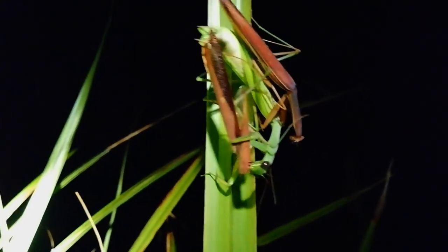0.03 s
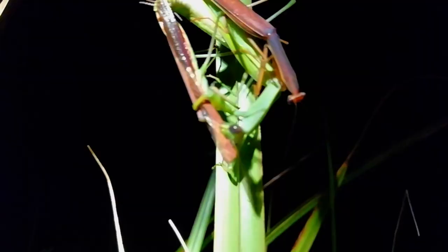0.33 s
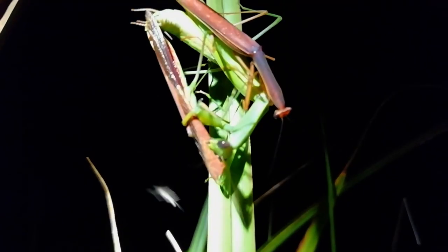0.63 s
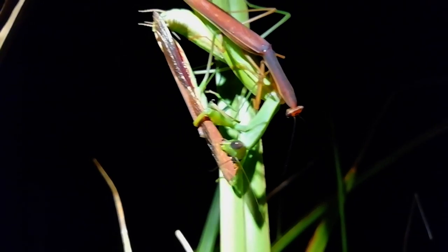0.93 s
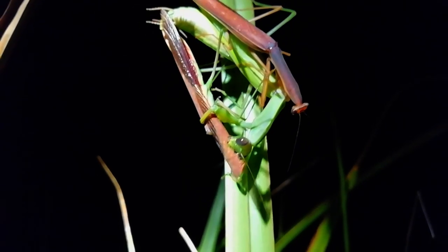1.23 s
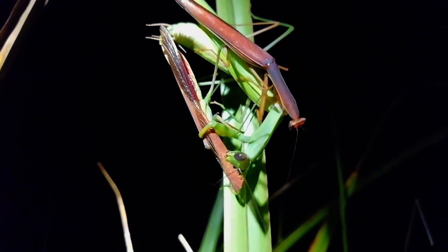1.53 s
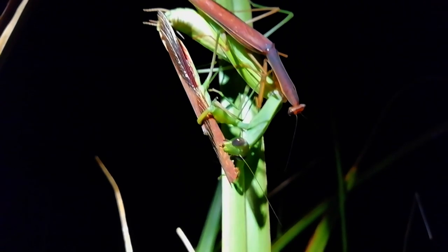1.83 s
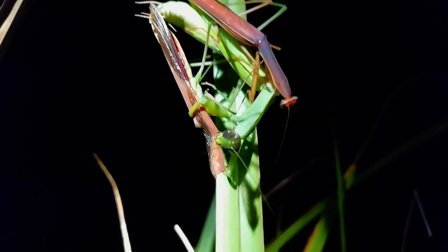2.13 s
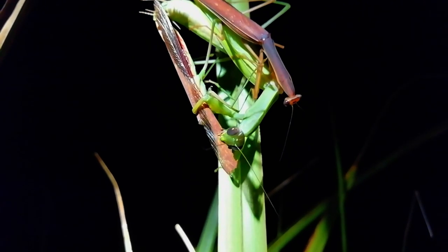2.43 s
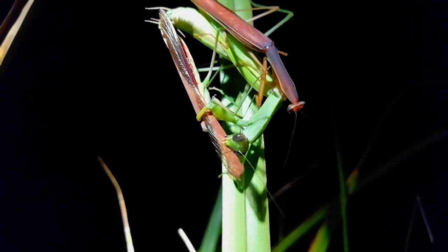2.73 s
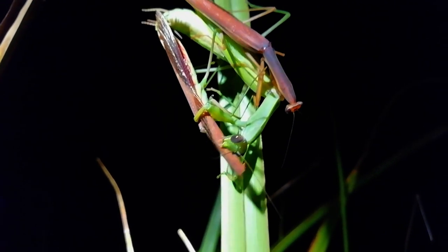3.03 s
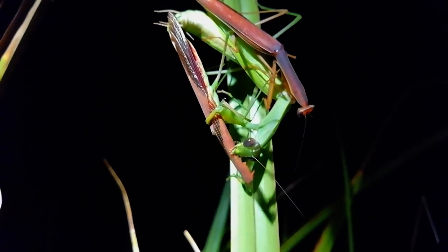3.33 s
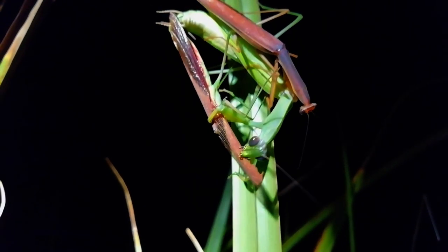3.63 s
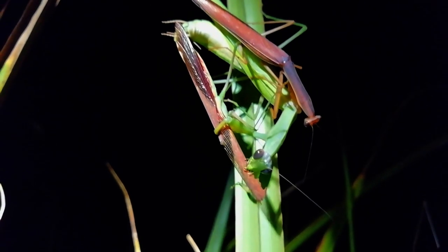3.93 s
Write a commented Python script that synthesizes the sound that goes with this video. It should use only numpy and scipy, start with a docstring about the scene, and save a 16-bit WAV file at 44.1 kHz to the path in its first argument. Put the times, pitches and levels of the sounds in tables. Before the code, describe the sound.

A dense cricket chorus trills and chirps throughout in night grass, opening with one close, shivering note. From about 0.6 seconds, short rising whistles and sharp ticks join, the ticks strongest near 1 second, as the right side turns duller. Soft microphone bumps follow over low rumble. A distant animal rasps faintly around 1.3, 2.5 and 3.7 seconds, and a stalk snaps lightly near 2.9.

```python
"""Night in tall grass, a hand-held camera's microphone amid a dense chorus of wing-stroking crickets.
A close cricket's notes open over near trills, a steady chirper and rising whistles. Within the first
second the right side loses most of its treble and sharp ticks set in; then bumps join the handling rumble.
From 1.3 s a distant animal rasps three times, and near 3 s a stalk snaps."""
import sys
import numpy as np
from scipy import signal
from scipy.fft import rfft, irfft, next_fast_len
from scipy.io import wavfile
from scipy.ndimage import map_coordinates

SR = 44100
rng = np.random.default_rng(int(sys.argv[2]) if len(sys.argv) > 2 else 0)


def file_out(sig):
    """Save sig as 16-bit WAV at sys.argv[1]."""
    # one column per channel
    cols = np.atleast_2d(sig).T
    # limit, then scale
    lim = np.clip(cols, -1, 1)
    pcm = np.round(lim * 32767).astype(np.int16)
    wavfile.write(sys.argv[1], SR, pcm)


N = 176400
RIGHT_LAG_S = .00055


def amp(db):
    """Decibels to gain."""
    return 10 ** (np.asarray(db) / 20)


def unit(x):
    """Scale to rms 1."""
    return x / np.sqrt(np.mean(x ** 2) + 1e-20)


def clock():
    """Time of each sample."""
    return np.arange(N) / SR


def along(points, hz):
    """Join (Hz, value) points on a log frequency axis."""
    f, v = np.transpose(points)
    return np.interp(np.log(hz + 1), np.log(f + 1), v)


def wobble(rate):
    """A smooth random curve, rate knots a second."""
    knots, steps = rng.standard_normal(1024), np.arange(0, N, 64)
    return np.interp(np.arange(N), steps, map_coordinates(knots, [steps * rate / SR], mode="wrap"))


def filtered(x, response):
    """Weight x by a gain that depends on frequency."""
    m = next_fast_len(N + 8192)
    return irfft(rfft(x, m) * response(np.fft.rfftfreq(m, 1 / SR)), m)[..., :N]


def coloured(x, spectrum):
    """Filter x through (Hz, dB) points."""
    return filtered(x, lambda hz: amp(along(spectrum, hz)))


def noise(spectrum, apart):
    """Coloured stereo noise; apart is the side over the mid."""
    mid, side = coloured(rng.standard_normal((2, N)), spectrum)
    return unit(np.array([mid + apart * side, mid - apart * side]))


def flutter(width_hz):
    """Slow noise that widens a tone into a band."""
    return unit(filtered(rng.standard_normal(N), lambda hz: 1 / (1 + (hz / width_hz) ** 4) ** .5))


def arch(u):
    """A smooth swell from u = 0 to 1."""
    return np.sin(np.pi * np.clip(u, 0, 1))


def add(track, s, sound):
    """Mix a sound into a track from time s."""
    i = round(s * SR)
    a, b = max(i, 0), min(i + len(sound), N)
    if b > a:
        track[a:b] += sound[a - i:b - i]


def wings(hz, rate, share, fall_hz, drift, scatter):
    """Wing strokes: a tone falls through hz for a share of each stroke, varying in size and phase."""
    phases, sizes = rng.standard_normal((2, 2048))
    pace = rate * (1 + drift * wobble(12))
    strokes = rng.random() + np.cumsum(pace) / SR
    k = strokes.astype(int) % 2048
    u = strokes % 1 / share
    cycles = u * share / pace * (hz + fall_hz * (1 - u) / 2)
    return unit(arch(u) ** 2 * amp(1.35 * sizes[k]) * np.sin(2 * np.pi * cycles + scatter * phases[k]))


def choirs(count=9):
    """Far crickets of two kinds, each on its own pitch and pace and from its own direction."""
    # Each row: centre in Hz, spread in Hz, strokes a second, level in dB.
    kinds = [(6265, 286, 82, -50), (8388, 505, 110, -49.5)]
    out = np.zeros((2, N))
    for hz, spread_hz, rate, db in kinds:
        voices = np.zeros((2, N))
        for detune in np.linspace(-1, 1, count):
            pace, lag = rng.uniform(-1, 1, 2)
            voice = wings(hz + spread_hz * detune, rate * np.exp(.4 * pace),
                          share=.59, fall_hz=324, drift=.03, scatter=1.47)
            voice *= amp(-3 * detune ** 2)
            voices += [voice, np.roll(voice, int(lag * RIGHT_LAG_S * SR / 2))]
        out += amp(db + .49 * wobble(7.8)) * unit(voices)
    return out


def chirper(first_s=.198, period_s=.2172, chirp_s=.125):
    """One cricket chirps like clockwork, in quick strokes of falling pitch."""
    from_middle = (clock() - first_s + period_s / 2) % period_s - period_s / 2
    swell = arch(from_middle / chirp_s + .5) ** .5
    strokes = wings(hz=7857, rate=156, share=.83, fall_hz=1430, drift=.027, scatter=.98)
    return grass(amp(-45.5) * swell * strokes, wet_db=-7, t60=.1)


def close_cricket(hz=5970, rate=118):
    """Close to the microphone, a cricket's strokes run together into shivering, nearly pure notes."""
    # Each row: start and end in seconds, level in dB.
    notes = [(-.1, .265, -48), (.43, .59, -57), (.72, .86, -59)]
    t = clock()
    gate = sum(amp(db) * np.clip(np.minimum(t - a, b - t) / .042, 0, 1) for a, b, db in notes)
    shiver = 1 + .3 * np.sin(2 * np.pi * rate * t) + .072 * wobble(90)
    return gate * unit(shiver * np.sin(2 * np.pi * hz * t + 1.8 * wobble(70.8)))


def singers():
    """Unbroken cricket songs stand out of the choirs as narrow bands."""
    # Each row: pitch in Hz, level in dB.
    songs = [(6220, -58.5), (6570, -60.5), (7945, -55.5), (8550, -60.5)]
    out = sum(amp(db) * unit(flutter(width_hz=36) * np.sin(2 * np.pi * hz * clock() + wobble(60)))
              for hz, db in songs)
    return grass(out, wet_db=-8.5, t60=.077)


def glide(hz, length_s, rise, waver):
    """A swelling, wavering whistle that glides through hz at rise Hz a second."""
    t = np.arange(int(length_s * SR)) / SR
    knots = rng.standard_normal((2, 16))
    phase, size = [np.interp(t / length_s, np.linspace(0, 1, len(k)), k) for k in knots]
    cycles = t * (hz + rise * (t - length_s) / 2)
    return np.sqrt(2) * arch(t / length_s) * amp(.97 * size) * np.sin(2 * np.pi * cycles + waver * phase)


def whistlers(far_count=120, length_s=.1, rise=5200, chirp_s=.17):
    """Rising whistles near and far, and soft, almost level chirps pitched above them."""
    # Each row: middle in seconds, pitch in Hz, level in dB.
    near_whistles = [(0.621, 3050, -50.5), (0.811, 3240, -49.5), (1.11, 3110, -57), (1.408, 3280, -60),
                     (1.54, 3530, -60), (1.808, 3310, -51.5), (1.961, 3140, -51.5), (2.111, 3103, -54),
                     (2.351, 3194, -53), (2.77, 3240, -56), (2.909, 3080, -48.5), (3.15, 3276, -51.5),
                     (3.299, 3280, -58), (3.62, 3070, -52.5), (3.712, 3170, -48)]
    # Each row: middle in seconds, level in dB.
    soft_chirps = [(1.19, -65.5), (1.609, -66.5), (2.07, -67), (2.529, -62.5), (2.929, -65.5), (3.401, -71)]
    out = np.zeros(N)
    for s, hz, db in near_whistles:
        add(out, s - length_s / 2, amp(db) * glide(hz, length_s, rise, waver=.6))
    for k, (when, pitch, size) in enumerate(rng.standard_normal((far_count, 3))):
        far_whistle = glide(3190 + 260 * np.tanh(pitch), length_s, rise, waver=.65)
        add(out, (k + when - 1) / far_count * N / SR, amp(-61.5 + 1.5 * size) * far_whistle)
    for s, db in soft_chirps:
        add(out, s - chirp_s / 2, amp(db) * glide(3965, chirp_s, rise=-350, waver=.4))
    return grass(out, wet_db=-6, t60=.18)


def trillers(flat_hz=187, settle_s=.064):
    """Near crickets trill in turns; each trill starts flat and settles on its pitch."""
    # Each row: start, end and fade in seconds, pitch in Hz, strokes a second,
    # sounding share of a stroke, fall within a stroke in Hz, relative level in dB.
    trills = [(-.4, .95, .04, 4250, 76.5, .3, 650, -58.5), (2.16, 4.1, .04, 4260, 76.5, .3, 700, -56.5),
              (.7, 4.1, .2, 4740, 78.5, .4, 150, -60.5), (2.15, 4.1, .1, 4620, 77, .35, 300, -63),
              (.13, .88, .3, 5420, 45, .85, 200, -54), (2.22, 2.9, .1, 5350, 45, .6, 150, -60),
              (2.86, 4.1, .06, 5440, 45, .6, 420, -56.5)]
    t, out = clock(), np.zeros(N)
    for start, end, fade_s, hz, rate, share, fall_hz, db in trills:
        gate = np.clip(np.minimum(t - start, end - t) / fade_s, 0, 1)
        pitch = hz - flat_hz * np.exp(-np.abs(t - start) / settle_s)
        level = amp(db - 1 + .7 * wobble(5))
        out += level * gate * wings(pitch, rate, share, fall_hz, drift=.01, scatter=1.6)
    return grass(out, wet_db=-5, t60=.05)


def ticks(t60=.08, snap_s=2.915, snap_t60=.064):
    """Short, sharp ticks in one broad resonance, and the dry snap of a stalk."""
    # Each row: start in seconds, pitch in Hz, level in dB.
    hits = [(.662, 2830, -52), (.914, 2630, -40), (.961, 2660, -51), (1.153, 2680, -39.5),
            (1.507, 2670, -52), (1.597, 2780, -52), (1.979, 2850, -47), (2.153, 2930, -50),
            (2.491, 2650, -51), (2.58, 2680, -53), (2.7, 2680, -50), (2.999, 2700, -52), (3.376, 2710, -51),
            (3.466, 2570, -48), (3.563, 2810, -51), (3.7, 2780, -50), (3.749, 2800, -49), (3.95, 2800, -47)]
    out, t = np.zeros(N), np.arange(SR // 5) / SR
    grain = flutter(width_hz=180)
    for s, hz, db in hits:
        rough = unit(grain[rng.integers(N - len(t)):][:len(t)])
        envelope = amp(db - 60 * t / t60) * (1 - np.exp(-t / .001))
        add(out, s, envelope * (rough + .6) * np.sin(2 * np.pi * hz * t))
    out = coloured(out, [(1900, -25), (2500, 0)])
    snap = unit(coloured(rng.standard_normal(N), [(900, -43), (1700, 11), (3500, 1), (6000, -27)]))
    add(out, snap_s, amp(-52 - 60 * t / snap_t60) * snap[:len(t)])
    return grass(out, wet_db=-8, t60=.11)


def hoarse_calls(from_hz=1600, to_hz=1200):
    """A distant animal rasps; the resonance of its throat sinks through each call."""
    # Each row: start and length in seconds, level in dB. The middle two overlap into one call.
    calls = [(1.3, .2, -58.5), (2.44, .1, -60), (2.51, .135, -59), (3.67, .26, -55.5)]
    out = np.zeros(N)
    for s, length_s, db in calls:
        u = np.linspace(0, 1, int(length_s * SR))
        phase = 2 * np.pi * np.cumsum(from_hz + (to_hz - from_hz) * u) / SR
        rasp = sum(flutter(width_hz=240)[:len(u)] * wave(phase) for wave in (np.sin, np.cos))
        add(out, s, amp(db) * arch(u ** .84) ** 1.1 * rasp)
    out = coloured(out, [(850, -25), (1150, 0), (1700, 0), (2100, -7)])
    return grass(out, wet_db=-7, t60=.15)


def far_field(drone_hz=556, pulse_hz=60.3):
    """The blur of the farthest insects, a bush-cricket's fine pulsing sizzle, and a faint drone."""
    # Each row of both: frequency in Hz, relative level in dB.
    blur_colour = [(200, -11), (900, -18), (1150, -17.5), (1290, -18), (1500, -19), (2250, -22.5),
                   (2700, -3.5), (3200, -1), (3550, -2), (3800, -14), (4400, -5), (5000, -5.5), (5400, 3.5),
                   (5650, 0), (6200, 11), (6900, -2.5), (7400, 2), (8200, 7.5), (9000, 3.5), (9600, -9),
                   (10500, -10), (16000, -26.5)]
    sizzle_colour = [(8000, -51), (10000, -17.5), (11000, -1), (12400, -4), (13200, 0), (14300, -4.5),
                     (15700, 0.5)]
    pulse = 1 + .14 * np.sin(2 * np.pi * pulse_hz * clock() + .5 * wobble(3))
    drone = amp(-82) * unit(flutter(width_hz=10) * np.sin(2 * np.pi * drone_hz * clock()))
    blur = amp(-47 + .39 * wobble(5.94)) * noise(blur_colour, apart=.95)
    sizzle = amp(-53 + .49 * wobble(5.2)) * pulse * noise(sizzle_colour, apart=.9)
    return blur + sizzle + drone


def handling(rumble_db, bump_t60=.07):
    """The hand on the camera reaches the microphone as soft bumps, rustles and low rumble."""
    # Each row: start in seconds, pitch in Hz, relative level in dB.
    knocks = [(1.0, 30.7, -54.5), (1.033, 72.6, -46.5), (1.166, 45, -58.5), (1.568, 55, -58.5),
              (1.74, 128, -59), (1.877, 207, -57), (2.182, 79, -57.5), (2.258, 30, -61),
              (3.483, 116, -54.5), (3.618, 105, -49), (3.955, 117, -50.5)]
    # Each row: start and length in seconds, level in dB.
    rustles = [(2.985, 0.31, -69.5), (3.733, .3, -59)]
    # Each row of both: frequency in Hz, relative level in dB.
    rustle_colour = [(100, -7), (220, 3.5), (320, 9), (480, -8.5), (800, -9.5), (1500, -7.5), (2200, -6),
                     (3000, -18), (6000, -44)]
    rumble_colour = [(15, 2), (35, 8), (90, 5), (150, 0.5), (230, -13), (340, -22), (480, -34.5),
                     (550, -20.5), (640, -50.5), (1000, -26), (3000, -15.5), (8000, -48)]
    bumps, t = np.zeros(N), np.arange(SR // 4) / SR
    thud = flutter(width_hz=140)
    for s, hz, db in knocks:
        puff = thud[rng.integers(N - len(t)):][:len(t)]
        envelope = amp(db - 60 * t / bump_t60) * (1 - np.exp(-t / .00085))
        add(bumps, s, envelope * (2 * np.sin(2 * np.pi * hz * t) + 1.1 * puff))
    swells = sum(amp(db) * arch((clock() - s) / length_s) for s, length_s, db in rustles)
    rustle = swells * noise(rustle_colour, apart=.7)
    rumble = amp(-67 + rumble_db + 3.4 * wobble(10.19)) * noise(rumble_colour, apart=.051)
    return bumps + rustle + rumble


def grass(x, wet_db, t60):
    """Direct sound plus scatter from the vegetation, different on each side."""
    t = np.arange(SR // 3) / SR
    tail = rng.standard_normal((2, len(t))) * amp(-60 * t / t60)
    wet = signal.fftconvolve(x[None], tail / np.linalg.norm(tail[0]), axes=1)[:, :N]
    return (x + amp(wet_db) * wet) / np.hypot(1, amp(wet_db))


def dulled(x, share):
    """The treble sinks as share goes from 0 to 1."""
    # Each row: frequency in Hz, gain in dB when fully dull.
    treble_loss = [(400, 0), (900, 0.5), (1400, -0.5), (2200, -17.5), (3000, -13.5), (4300, -17),
                   (5400, -17), (6200, -19), (7000, -26), (7900, -27.5), (8600, -27), (10000, -16),
                   (15500, -16.5)]
    hz, t, spectra = signal.stft(x, SR, nperseg=512)
    gain_db = np.outer(along(treble_loss, hz), np.interp(t, clock(), share))
    return signal.istft(spectra * amp(gain_db), SR, nperseg=512)[1][:N]


def scene():
    """The animals at the microphone, whose right side lags and turns dull, over the handling."""
    # Each row: time in seconds, left and right gain in dB, share of dulling, rumble gain in dB.
    sides = [(0, -0.5, 1, 0.051, -5), (.2, -2, 1, 0.036, -5.5), (.42, -2.5, 0, 0.15, 3),
             (.68, -1.5, 0, 0.47, 2.5), (.87, 0, 0, 0.99, 2.5), (2.3, .5, 0, 1, 4.5), (4, 0.5, 0, 1, 1)]
    times, *columns = np.transpose(sides)
    left_db, right_db, dull, rumble_db = [np.interp(clock(), times, c) for c in columns]
    crickets = choirs() + close_cricket() + singers() + trillers() + chirper()
    field = crickets + whistlers() + ticks() + hoarse_calls() + far_field()
    left, right = field * amp([left_db, right_db])
    left, right = np.array([left, dulled(right, dull)]) + handling(rumble_db)
    return np.array([left, np.pad(right, (round(RIGHT_LAG_S * SR), 0))[:N]])


def record(dry):
    """The camera keeps nothing above its band limit."""
    return filtered(dry, lambda hz: hz < 15780)


dry = scene()
out = record(dry)
file_out(out)
```